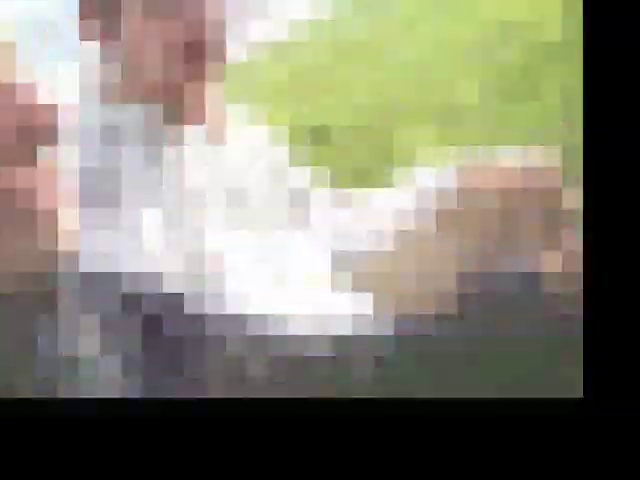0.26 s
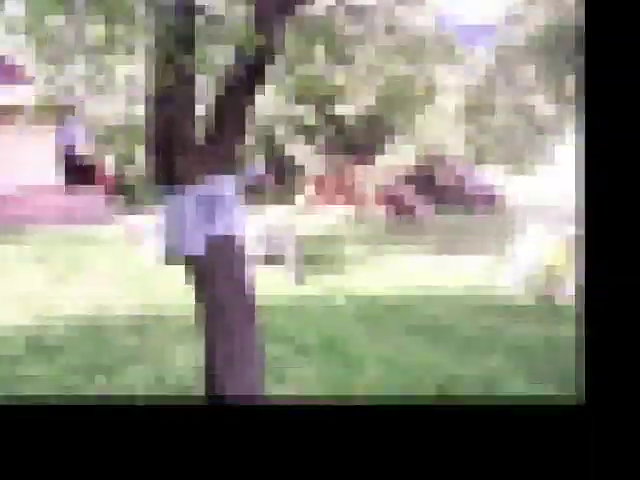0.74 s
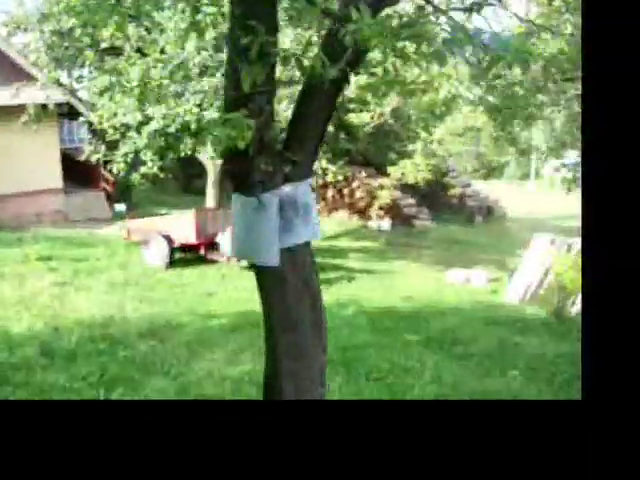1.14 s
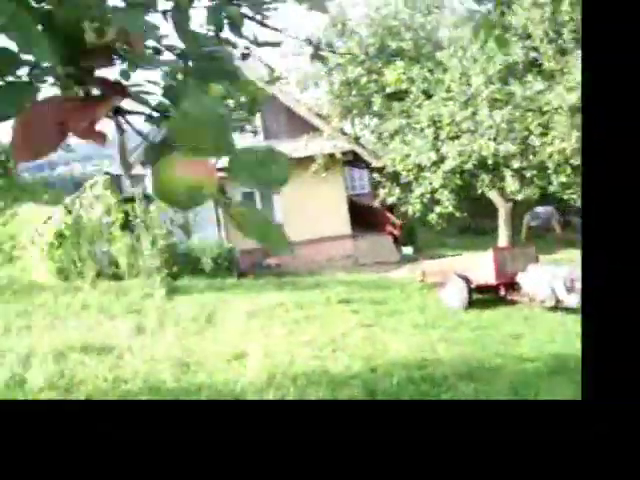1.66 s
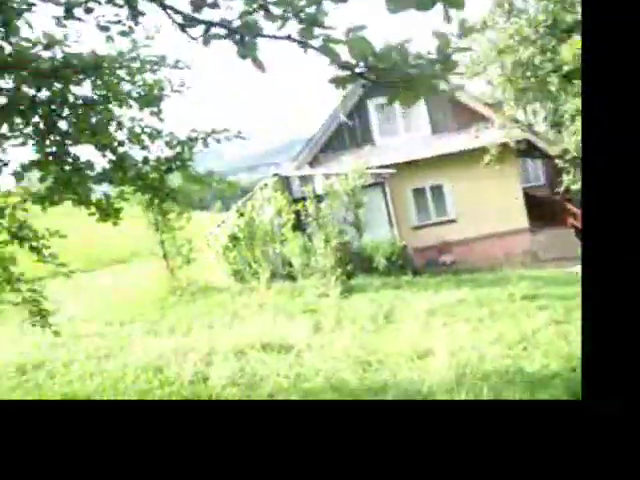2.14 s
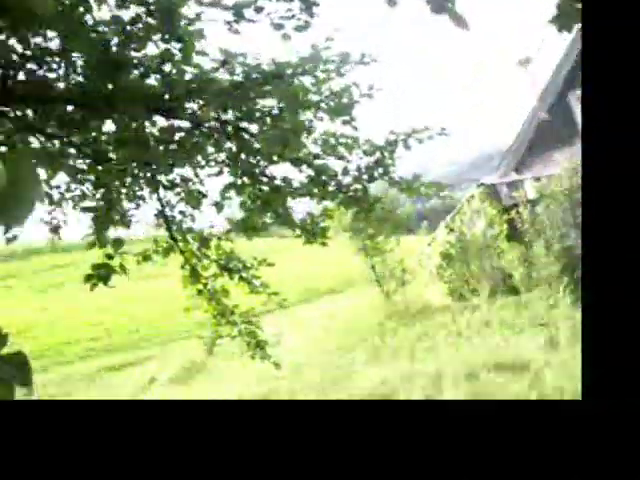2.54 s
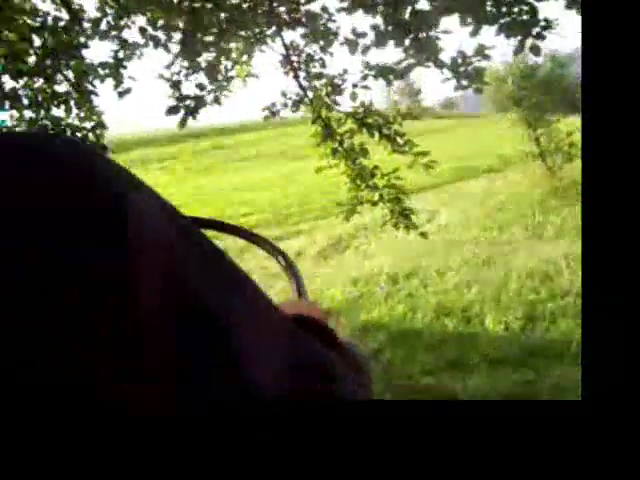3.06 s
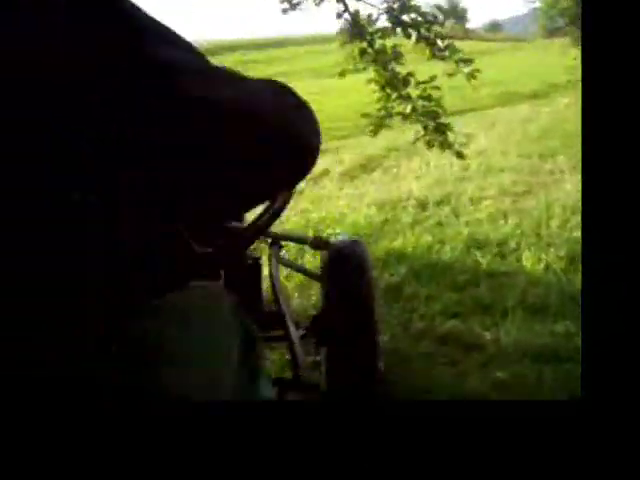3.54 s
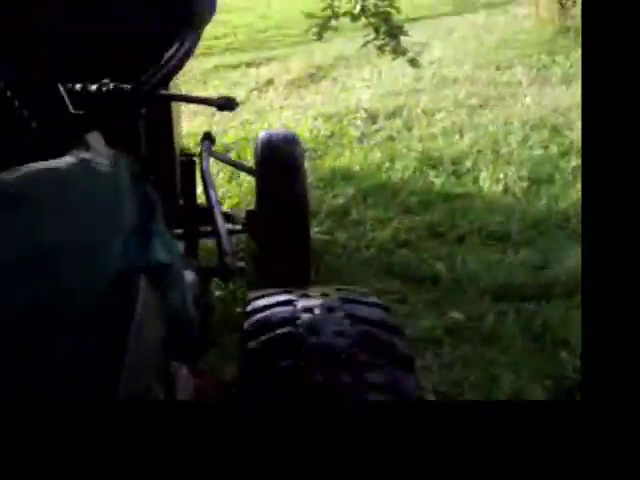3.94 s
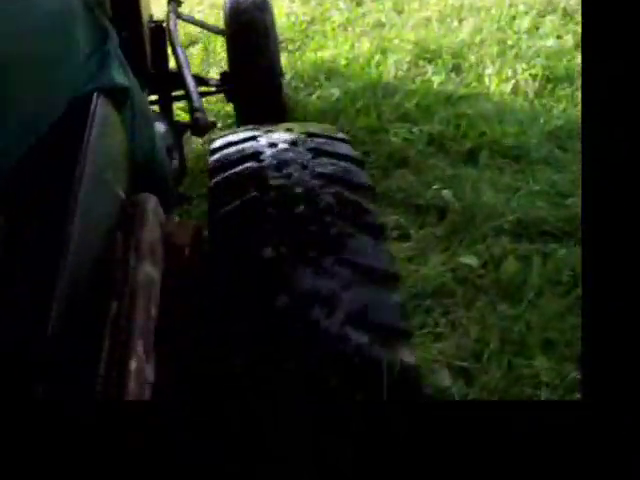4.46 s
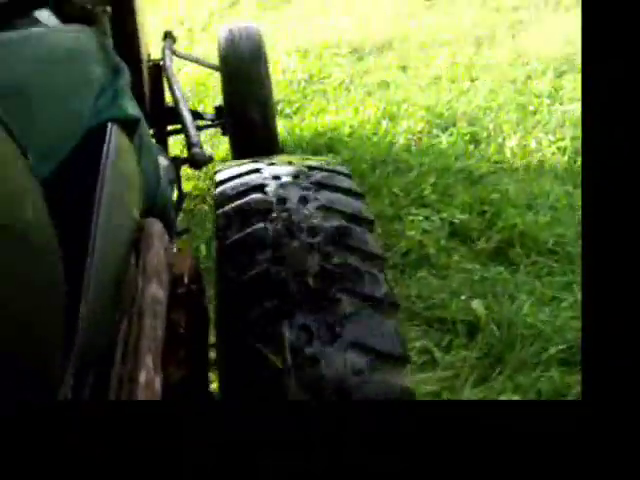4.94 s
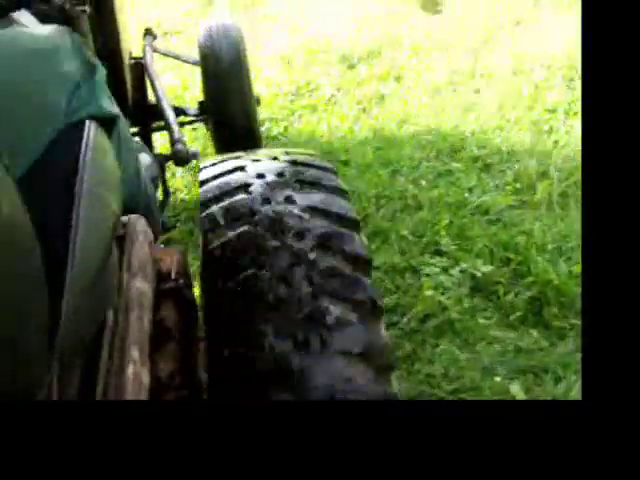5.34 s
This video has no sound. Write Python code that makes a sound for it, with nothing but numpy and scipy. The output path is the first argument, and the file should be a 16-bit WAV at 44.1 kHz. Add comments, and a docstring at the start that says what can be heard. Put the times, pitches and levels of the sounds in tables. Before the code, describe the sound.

A small single-cylinder tractor engine runs close by on a lawn throughout. At the start it beats briskly, about seven times a second, with sharp tinny knocks and the rush of a mower behind it. Around 0.5 seconds a slower idle takes over, about six short, hollow exhaust puffs a second, and the rush fades to a faint background by 1.2 seconds. Light valve ticks and soft gulps of air accompany the beat. Groups of knocks rattle loose sheet metal at roughly 1.5 to 2.2, 2.7 to 3.1, 3.5 to 4.1 and 4.6 to 5 seconds; between them the engine coasts with slightly lower puffs. From about 3 seconds the puffs are louder and quicken slightly, continuing until the end near 5.6 seconds. Low chassis rumble and faint gear rattle lie underneath. The small microphone sounds a little dull and overloads on strong beats, with a faint, short outdoor echo.

```python
"""On a lawn, close to a small single-cylinder tractor, with a little camera microphone that overloads. A brisk
working beat and the rush of the mower fade out as a slow idle beat fades in, about six beats a second. Every
cycle puffs through the silencer and ticks its valves. When the governor feeds the engine, it also gulps air and
knocks, rattling the tinwork; in between it coasts, and the cooler exhaust rings lower. Chassis and gears run on
underneath, and ground, bodywork and trees return a faint, short echo."""
import sys
import numpy as np
from scipy import signal
from scipy.fft import rfft, irfft, next_fast_len
from scipy.io import wavfile
from scipy.ndimage import map_coordinates

SR = 44100
rng = np.random.default_rng(int(sys.argv[2]) if len(sys.argv) > 2 else 0)


def int16_out(signal):
    """Quantize to a 16-bit WAV file."""
    q = np.round(np.clip(np.atleast_2d(signal).T, -1, 1) * 32767)
    wavfile.write(sys.argv[1], SR, q.astype(np.int16))


N = 246959
AGE = np.arange(SR // 4) / SR  # time since an event began [s]


def amp(db):
    """Decibels to gain."""
    return 10 ** (np.asarray(db) / 20)


def unit(x):
    """Scale to rms 1."""
    return x / np.sqrt(np.mean(x ** 2) + 1e-20)


def along(points, hz):
    """Read (frequency, value) points on a log frequency axis."""
    f, v = np.transpose(points)
    return np.interp(np.log(hz + 1), np.log(f + 1), v)


def curves(rows, times):
    """Each column after the time, read at the given times."""
    s, *columns = np.transpose(rows)
    return [np.interp(times, s, column) for column in columns]


def wobble(rate):
    """A smooth random curve, rate knots a second."""
    knots = rng.standard_normal(int(N * rate / SR) + 4)
    return map_coordinates(knots, [np.arange(N) * rate / SR])


def filtered(x, response):
    """Pass x through a complex frequency response."""
    size = next_fast_len(N + SR // 2)
    return irfft(rfft(x, size) * response(np.fft.rfftfreq(size, 1 / SR)), size)[:N]


def noise(spectrum):
    """Coloured noise of rms 1."""
    return unit(filtered(rng.standard_normal(N), lambda hz: amp(along(spectrum, hz))))


def add(track, s, sound):
    """Mix a sound in at time s."""
    start = max(0, round(s * SR))
    part = track[start:start + len(sound)]
    part += sound[:len(part)]


def swell(rise, t60):
    """An envelope that rises and dies away; both times in seconds."""
    return (1 - np.exp(-AGE / rise)) * amp(-60 * AGE / t60)


def bursts(times, levels_db, rise, t60):
    """One swell at each time, peaking at its level; t60 is shared or given for each."""
    track = np.zeros(N)
    for s, db, life in np.broadcast(times, levels_db, t60):
        shape = swell(rise, life)
        add(track, s, amp(db) * shape / shape.max())
    return track


# decay of the echo on the lawn: (frequency [Hz], t60 [s])
LAWN_DECAY = [(100, 0.19), (280, 0.15), (1000, 0.09), (4000, 0.097)]
def lawn_echo(x):
    """Ground, bodywork and trees scatter a short tail, reaching the microphone 6 ms late."""
    hz, t, spectra = signal.stft(rng.standard_normal(SR // 4), SR, nperseg=256)
    decay = amp(-60 * t / along(LAWN_DECAY, hz)[:, None])
    tail = signal.istft(spectra * decay, SR, nperseg=256)[1]
    response = np.pad(tail / np.linalg.norm(tail), (round(.006 * SR), 0))
    return signal.fftconvolve(x, response)[:N]


# the bed behind the engine: (time [s], mower and drive rush [dB], chassis rumble [dB], gear rattle [dB])
BED_LEVELS = [(0.0, -12, -17.5, -30.5), (0.23, -15, -20, -27), (0.76, -21.5, -26, -32),
              (1.2, -32.5, -29.5, -43), (1.73, -32.5, -32, -38), (1.98, -28.5, -25, -38.5),
              (2.45, -37, -32.5, -43), (2.89, -34.5, -30, -37), (3.38, -34.5, -29, -41),
              (3.93, -28, -25.5, -36.5), (5.15, -27.5, -25, -34.5), (5.6, -28, -24, -36.5)]
# spectra of those three: (frequency [Hz], level [dB])
MOWER_SPECTRUM = [(150, -22.5), (330, -9.5), (480, 2.5), (620, -1.5), (780, 2), (1050, -6), (1350, -18.5),
                  (1900, -23.5), (4000, -40.5)]
CHASSIS_SPECTRUM = [(15, -12.5), (40, -2.5), (80, -2), (105, -0.5), (160, 1.5), (270, 4), (380, -4),
                    (600, -28), (1500, -61)]
GEAR_SPECTRUM = [(700, -22.5), (1400, -11), (1900, 1.5), (2300, 3.5), (2700, -3), (3100, -3.5), (3700, -9),
                 (4300, -18.5), (4900, -31.5)]
def mower_and_drive():
    """The mower's rush, the shaking chassis and the gears fill the gaps between beats."""
    rush_db, rumble_db, rattle_db = curves(BED_LEVELS, np.arange(N) / SR)
    rush = amp(rush_db - 2 + .35 * wobble(45)) * noise(MOWER_SPECTRUM)
    rumble = amp(rumble_db - 1 + .24 * wobble(37)) * noise(CHASSIS_SPECTRUM)
    rattle = amp(rattle_db - 3.5 + 2.2 * wobble(90)) * noise(GEAR_SPECTRUM)
    return rush + rumble + rattle


def work_beats(start_s=.0769, cycle_s=.1353, count=6):
    """Puff times of the brisk, even working beat."""
    return start_s + cycle_s * np.arange(count)


# idle speed as the governor hunts: (time [s], speed [cycles/s])
GOVERNED_SPEED = [(0.5, 5.904), (1.008, 6.122), (1.138, 5.859), (1.488, 5.892), (2.204, 6.175),
                  (2.461, 5.93), (3.172, 6.176), (3.384, 6.125), (4.081, 6.357), (4.472, 6.342),
                  (5.174, 6.531)]
def idle_beats(start_s=.5265):
    """Puff times at idle: one for each whole cycle that the engine turns."""
    t = np.arange(round(start_s * SR), N) / SR
    turned = np.cumsum(curves(GOVERNED_SPEED, t)[0]) / SR
    return np.interp(np.arange(int(turned[-1]) + 1), turned, t)


# resonances of the cylinder head: (frequency [Hz], width [Hz], level [dB])
HEAD_MODES = [(1230, 230, -5.5), (2214, 123, 8), (2366, 99, 9), (2607, 100, 8), (3350, 790, -21.5)]
def head_ring():
    """Noise of rms 1 ringing in the modes of the cylinder head, which alternate in sign."""
    def response(hz):
        return sum((-1) ** k * amp(db) * 1j * hz * width / (centre ** 2 - hz ** 2 + 1j * hz * width)
                   for k, (centre, width, db) in enumerate(HEAD_MODES))
    return unit(filtered(rng.standard_normal(N), response))


# valves at idle: (time [s], inlet clink [dB], exhaust lift [dB], seating [dB], coasting intake [dB])
VALVE_LEVELS = [(0.55, -37, -29, -37, -12), (0.9, -21.5, -18, -26.5, -4.5),
                (1.5, -27.5, -21.5, -26.5, -26.5), (2.15, -24, -22, -32, -21.5),
                (2.9, -36.5, -33, -29.5, -23), (3.4, -43, -25, -32.5, -14), (4.2, -39.5, -26, -33.5, -2.5),
                (5.55, -40.5, -29, -36, -4)]
# spectra of the air intake and the valve ticks: (frequency [Hz], level [dB])
GULP_SPECTRUM = [(60, -21), (190, -9), (290, 10), (450, -7.5), (620, 1), (780, -1.5), (1100, -7),
                 (1500, -26), (2100, -23), (2650, -15.5), (3200, -37), (4800, -57.5)]
VALVE_SPECTRUM = [(150, -16.5), (450, -8.5), (850, 9.5), (1400, -3.5), (1900, -5), (2350, 6.5), (2650, 1),
                  (3100, -17.5), (4000, -16.5), (4900, -49)]
def valve_gear():
    """On the cam, the inlet gulps air and clinks; the exhaust valve ticks as it lifts and seats."""
    gulp_lead_s, inlet_lead_s, lift_lead_s, seat_lag_s = .07914, .08, .01, .027  # around the puff
    work, idle = work_beats(), idle_beats()
    beats = np.r_[work, idle]
    work_db, = curves(WORK_PUFFS, work)
    inlet_db, lift_db, seat_db, coasting_db = curves(VALVE_LEVELS, idle)
    intake_db = np.where(fired(idle), 0, coasting_db)  # a coasting cycle draws more softly
    gulp = bursts(idle - gulp_lead_s, intake_db - 17.5, rise=.005, t60=.089) * noise(GULP_SPECTRUM)
    inlet = bursts(idle - inlet_lead_s, inlet_db + intake_db, rise=.0018, t60=.086)
    lift = bursts(beats - lift_lead_s, np.r_[work_db - 27, lift_db], rise=.012, t60=.06)
    seat = bursts(beats + seat_lag_s, np.r_[work_db - 32, seat_db], rise=.0058, t60=.065)
    tick = (inlet + lift + amp(-3.5) * seat) * noise(VALVE_SPECTRUM)
    clink = (amp(-5) * seat + amp(-16) * (inlet + lift)) * head_ring()
    return gulp + tick + clink


# resonances of the frame: (frequency [Hz], level [dB], t60 [s])
FRAME_MODES = [(51.4, -4.5, 0.093), (159.6, -3.5, 0.078), (195, 2, 0.049), (275, -0.5, .05)]
# the frame shakes more at idle: (time [s], level [dB])
FRAME_SHAKE = [(0.6, -7.5), (0.85, -2.5), (3.0, 2.5)]
def frame_thud(times, tin_db):
    """Each firing jolts the frame's low modes, harder when the tinwork rattles louder."""
    jolt = sum(amp(db) * swell(.0054, t60) * np.sin(2 * np.pi * hz * AGE) for hz, db, t60 in FRAME_MODES)
    shake_db, = curves(FRAME_SHAKE, times)
    thud = np.zeros(N)
    for s, db in zip(times, shake_db + .37 * tin_db - 3):
        add(thud, s - .003, amp(db) * jolt)
    return thud


# firings; a cycle without one coasts: (time [s], tin rattle [dB], head ring [dB])
FIRINGS = [(0.0442, -9.5, -42), (0.1757, -18, -33), (0.3147, -12, -17), (0.4518, -16.5, -38),
           (0.487, -18, -13), (0.5863, -19, -41), (0.6526, -13.5, -8.5), (0.7206, -17.5, -25),
           (0.8192, -11, -5), (1.4891, -20, -8), (1.6602, -11.5, -5.5), (1.8242, -11, -10),
           (1.9882, -16, -13), (2.1515, -24.5, -23.5), (2.6542, -18.5, -15.5), (2.8182, -14, -17),
           (2.984, -12.5, -17), (3.1434, -14, -23), (3.4705, -22.5, -21.5), (3.6331, -20, -13),
           (3.793, -14.5, -27), (3.9526, -13.5, -17), (4.1082, -14, -33), (4.5838, -14, -13.5),
           (4.7399, -15, -18.5), (4.894, -13, -31), (5.0484, -15.5, -35)]
# decay of the tinwork, short and dry at the working beat: (time [s], t60 [s])
TIN_DECAY = [(0.6, 0.037), (1.7, 0.075), (2.8, 0.11), (5.0, 0.089)]
# spectrum of the tinwork: (frequency [Hz], level [dB])
TIN_SPECTRUM = [(200, -39.5), (450, -3.5), (750, 2.5), (1000, -2), (1350, -15), (1800, -2.5), (2400, 0),
                (2900, -1), (3200, -3.5), (3550, -2), (3900, -7), (4250, -9.5), (4900, -26.5)]
def knocks():
    """Combustion shakes up a rattle in the loose tinwork, rings the head and jolts the frame."""
    times, tin_db, head_db = np.transpose(FIRINGS)
    tin_t60, = curves(TIN_DECAY, times)
    chatter = unit(noise(TIN_SPECTRUM) * amp(1.6 * wobble(450)))
    tin = bursts(times, tin_db - 5, rise=.018, t60=tin_t60) * chatter
    ring = bursts(times, head_db - 5, rise=.0069, t60=.062) * head_ring()
    return tin + ring + frame_thud(times, tin_db)


def fired(times, window_s=.06):
    """Whether a knock comes just before each puff."""
    lead = times[:, None] - np.transpose(FIRINGS)[0]
    return np.any((lead > 0) & (lead < window_s), axis=1)


# puffs of the fading working beat: (time [s], level [dB])
WORK_PUFFS = [(0.08, 6.5), (0.35, 10), (0.49, 2.5), (0.62, 3), (0.75, -8)]
# puffs at idle: (time [s], level [dB], coasting lower mode [Hz], coasting upper mode [Hz])
IDLE_PUFFS = [(0.52, 0, 260, 333), (0.7, 9.5, 249, 320), (1.65, 10.5, 245, 358), (2.05, 7.5, 231, 325),
              (2.4, 12, 225.5, 279), (3.0, 13.5, 240, 296), (3.3, 15, 239.3, 291.6), (4.3, 15, 252, 316),
              (5.5, 16, 265.6, 328)]
def puffs():
    """Time, level and two silencer pitches of each puff; the hot gas of a firing rings higher."""
    work_modes_hz = 259, 340  # lower and upper, when coasting
    hot_lower, hot_upper = 1.0745, 1.0134  # pitch ratios, firing over coasting
    pitch_scatter, scatter_db = .022, 1.03
    work, idle = work_beats(), idle_beats()
    working = np.broadcast_arrays(work, *curves(WORK_PUFFS, work), *work_modes_hz)
    idling = [idle, *curves(IDLE_PUFFS, idle)]
    times, db, lower_hz, upper_hz = np.hstack([working, idling])
    hot = fired(times)
    chance = rng.standard_normal((len(times), 3)).T
    lower_hz *= np.where(hot, hot_lower, 1) * (1 + pitch_scatter * chance[0])
    upper_hz *= np.where(hot, hot_upper, 1) * (1 + pitch_scatter * chance[1])
    return np.transpose([times, db + scatter_db * chance[2], lower_hz, upper_hz])


# resonances of the silencer shell: (frequency [Hz], level [dB])
SHELL_MODES = [(310.5, 2), (178, -5.5)]
# turbulence at the pipe's mouth: (frequency [Hz], level [dB])
JET_SPECTRUM = [(25, 0), (50, 1.5), (130, -6.5), (400, -8.5), (620, -4.5), (820, -1), (1100, -19),
                (1600, -23), (2400, -22), (3500, -25.5), (4800, -47.5)]
def exhaust():
    """Each puff rings two coupled silencer chambers, which start opposed and swell into a short 'tok'."""
    bend, warming_s = .3, .006  # the pitch climbs as hot gas fills the chambers
    clock = AGE - bend * warming_s * (1 - np.exp(-AGE / warming_s))
    rows = puffs()
    tone = np.zeros(N)
    for s, db, lower_hz, upper_hz in rows:
        ring = np.cos(2 * np.pi * lower_hz * clock) - np.cos(2 * np.pi * upper_hz * clock)
        add(tone, s, amp(db) * swell(rise=.01, t60=.037) * ring)
        hum = sum(amp(mode_db) * np.sin(2 * np.pi * hz * AGE + rng.uniform(0, 2 * np.pi))
                  for hz, mode_db in SHELL_MODES)
        add(tone, s + .0071, amp(-8) * swell(rise=.0025, t60=.05) * hum)  # the shell hums on briefly
    times, levels_db = rows.T[:2]
    jet = bursts(times, levels_db - 34, rise=.0041, t60=.096) * noise(JET_SPECTRUM)
    return tone + jet


def scene():
    """The engine close up, with its faint echo and the mower and drive behind it."""
    engine = exhaust() + knocks() + valve_gear()
    return (engine + amp(-18) * lawn_echo(engine) + mower_and_drive())[None]


# faint bright ticks, mostly on hard hits: (time [s], level [dB])
BRIGHT_TICKS = [(0.216, -41.5), (0.351, -41.5), (0.659, -35.5), (0.827, -49.5), (1.031, -59.5),
                (1.664, -42)]
# their spectrum: (frequency [Hz], level [dB])
TICK_SPECTRUM = [(3500, -30.5), (5500, 2.5), (7500, -2.5), (9500, -7), (12000, -9), (15000, -16)]
def record(dry):
    """The close mono microphone flattens loud swings and keeps a narrow band; a few ticks top it."""
    low_cut_hz, band_hz, top_hz = 14, 4916, 15700
    pressure, hardness = dry[0], 7
    ceiling = np.where(pressure > 0, .74, .94)  # the positive side overloads first
    clipped = pressure / (1 + np.abs(pressure / ceiling) ** hardness) ** (1 / hardness)
    centred = filtered(clipped, lambda hz: 1j * hz / (low_cut_hz + 1j * hz))
    narrow = filtered(centred, lambda hz: 1 / np.sqrt(1 + (hz / band_hz) ** 60))
    ticks = bursts(*np.transpose(BRIGHT_TICKS), rise=.0008, t60=.014) * noise(TICK_SPECTRUM)
    return filtered(narrow + ticks, lambda hz: hz < top_hz)[None]


dry = scene()
out = record(dry)
int16_out(out)
```